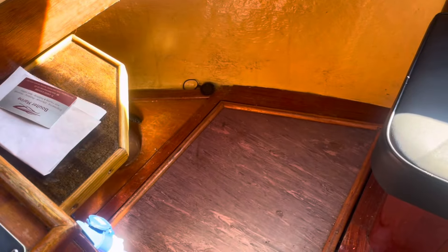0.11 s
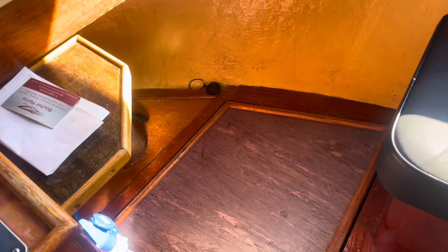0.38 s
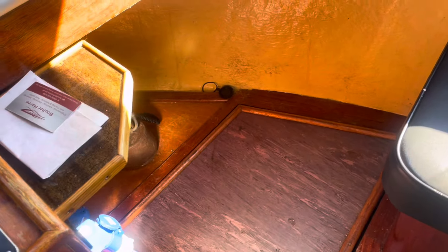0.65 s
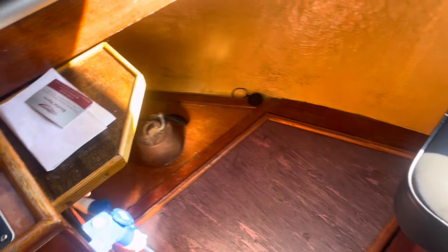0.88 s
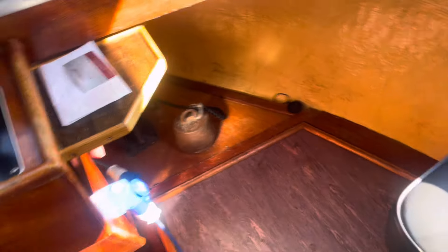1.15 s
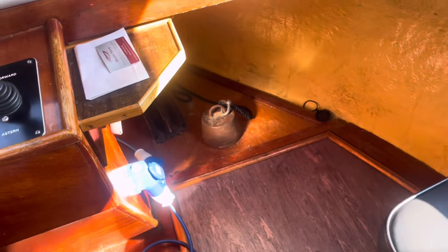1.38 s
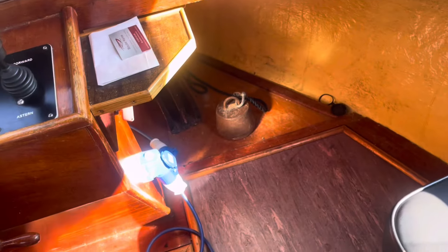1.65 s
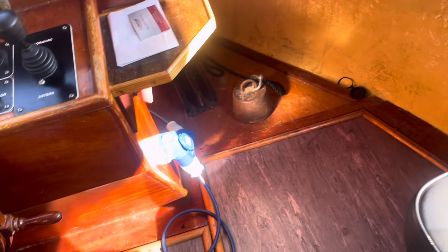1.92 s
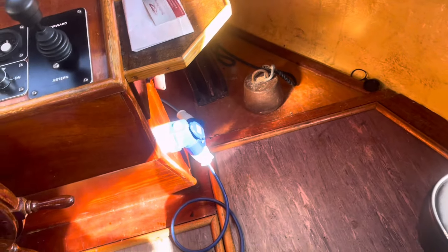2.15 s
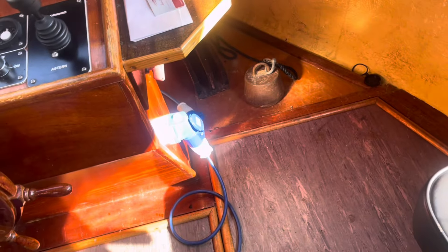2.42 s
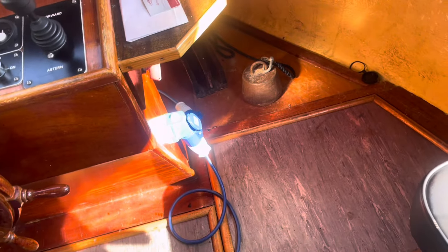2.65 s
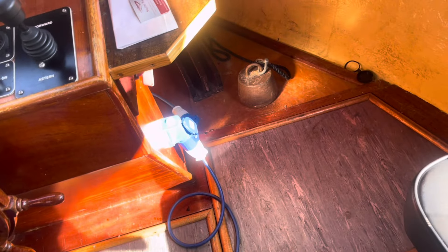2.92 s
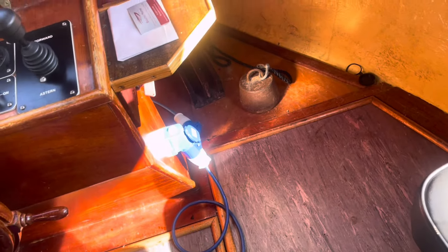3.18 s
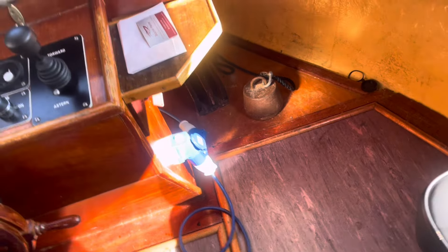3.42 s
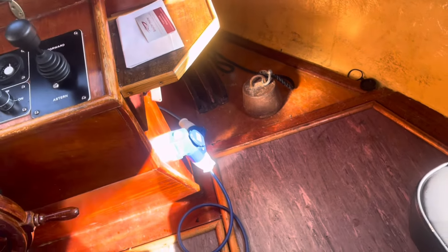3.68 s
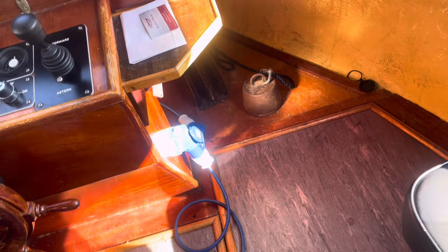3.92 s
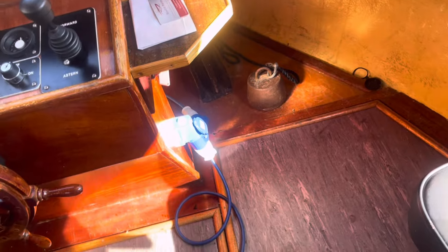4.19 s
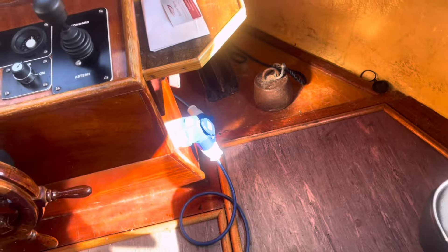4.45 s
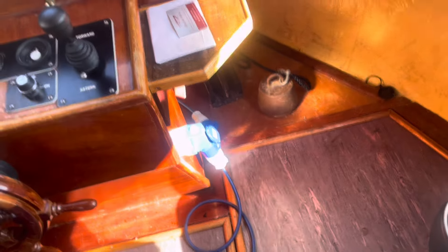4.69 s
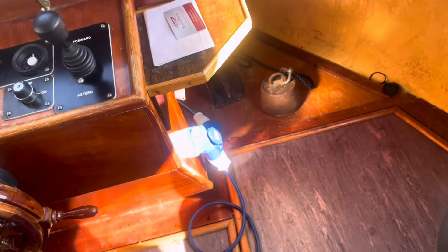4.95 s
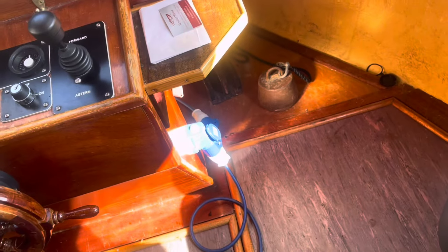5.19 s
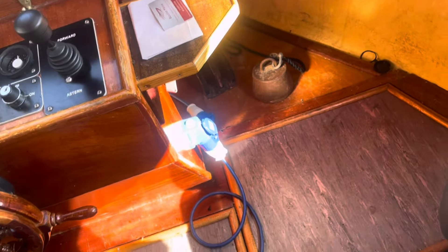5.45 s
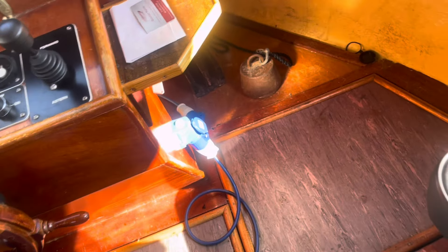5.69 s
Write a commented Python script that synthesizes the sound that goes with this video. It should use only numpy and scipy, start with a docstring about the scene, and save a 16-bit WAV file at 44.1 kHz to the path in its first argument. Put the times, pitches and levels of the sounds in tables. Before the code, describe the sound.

A small wooden boat cabin, heard close up through a handheld stereo microphone with short, dry echoes. A faint, slightly wavering low hum and soft rumble run underneath, the hum rising a little around 1 s and 3 s and nearly vanishing after 5 s. At about 0.15 to 0.25 s a hard wooden knock and bright click break out, rattling rapidly to rest by 0.35 s, followed by a double hollow knock at 0.4 s. Soft, deep thumps cluster from 0.95 to 1.2 s, with another at 1.55 s alongside a thin, high tick. Small low bumps and weak taps come at 2.05 to 2.5 s and near 3.2 s, with a light click at 3.4 s. Cloth and hand rustle swells from 3.6 s with a hollow shuffle. A firmer plank knock lands at 4.65 s, then airy rustling and fine ticks continue to the end, near 5.8 s.

```python
"""A faint hum and a low rumble run throughout, with cloth and hands rustling close by, inside a
small wooden boat cabin heard by a handheld pair of microphone ports. Hum is a wandering sine; rumble,
hollow shuffle and rustle are shaped noise. Knocks ring the modes of the woodwork, ticks are cracks of
noise with ringing small parts, bumps along a plank to the microphone are falling sweeps, and sparse
echoes give the cabin."""
import sys
import numpy as np
from scipy import signal
from scipy.fft import rfft, irfft, next_fast_len
from scipy.io import wavfile
from scipy.ndimage import uniform_filter1d

SR = 44100
rng = np.random.default_rng(int(sys.argv[2]) if len(sys.argv) > 2 else 0)


def voltage_ratio(level):
    """Linear amplitude factor for a level in decibels (scalar or array-like)."""
    return 10 ** (np.asarray(level, float) / 20)


def master_out(mix):
    """Clip the mix to full scale and print it as 16-bit PCM to the path in sys.argv[1]."""
    frames = np.transpose(np.atleast_2d(mix))
    ceiling = np.clip(frames, -1, 1)
    pcm = np.round(ceiling * 32767).astype(np.int16)
    wavfile.write(sys.argv[1], SR, pcm)


N = 257103  # samples

# Level of the hum. Each row: time in seconds, level in dB.
HUM_LEVEL = [(0, -55.5), (.5, -54), (1, -49.5), (1.5, -54), (2.001, -59), (2.5, -58.5), (2.8, -50.5),
             (3.4, -51.5), (3.6, -59), (4.3, -57), (4.9, -64), (5.4, -70), (5.83, -60)]
# Low noise in the cabin. Each row: time in seconds, rumble in dB, hollow shuffle of the woodwork in dB.
LOW_LEVELS = [(0, -42, -59), (.34, -47, -50.5), (.58, -51, -65.5), (.76, -46, -60.5), (1.0, -48, -55),
              (1.12, -54, -47), (1.29, -52.5, -62.5), (1.8, -53.5, -63.5), (2.03, -49.5, -62),
              (2.16, -57, -64.5), (2.34, -53, -60), (3.0, -53, -64), (3.64, -47.5, -52.5),
              (3.95, -48.5, -50), (4.24, -51, -53.5), (4.6, -48, -63), (5.08, -54.5, -54),
              (5.47, -59.5, -56), (5.83, -53.5, -60.5)]
# Spectra of rumble, shuffle and cloth. Each row: frequency in Hz, relative density in dB per Hz.
RUMBLE_SPECTRUM = [(22, 2), (35, -2), (58, 0), (70, -2.5), (85, 2.5), (115, -12), (160, -9), (300, -59),
                   (1000, -91)]
SHUFFLE_SPECTRUM = [(90, -22.5), (170, -0.5), (300, -0.5), (450, -4), (700, -11), (1000, -20),
                    (1500, -25.5), (3000, -35), (6000, -98)]
CLOTH_SPECTRUM = [(500, -6), (1000, -0.5), (1600, -1.5), (2300, 2), (4500, 8.5), (6500, 9), (8300, 14.5),
                  (11000, 8.5), (13000, 9.5), (14600, 11), (15600, 8), (16200, -21)]
# Faint rustle between the strokes. Each row: time in seconds, level in dB before the treble lift.
RESTLESS_LEVEL = [(0, -82), (.5, -75), (.8, -68), (1.25, -68.5), (1.46, -88), (1.8, -72), (2.3, -86),
                  (2.4, -71.5), (2.84, -67.5), (2.89, -69), (2.92, -63), (4.36, -63.5), (4.45, -88),
                  (4.55, -67.5), (4.95, -74.5), (5.1, -72), (5.83, -61)]
# Strokes of cloth and hands. Each row: peak in seconds, level in dB before the lift, swell in seconds,
# fade in seconds, treble lift in dB. Swell and fade each span 20 dB.
CLOTH_STROKES = [(.14, -61.5, 0.018, 0.091, -21), (0.239, -39.5, 0.011, .04, -35),
                 (0.289, -37.5, 0.044, 0.096, -19.5), (.41, -58, 0.042, 0.11, -25),
                 (.53, -69, 0.024, .07, -5), (0.661, -52.5, 0.084, 0.097, -23),
                 (1.04, -64, 0.24, 0.36, -24.5), (1.18, -55.5, .04, 0.058, -26.5),
                 (1.23, -59.5, 0.051, 0.039, 1), (1.36, -69, 0.21, 0.099, -3),
                 (1.57, -54, 0.072, 0.14, -10), (1.99, -65, 0.19, 0.075, -16),
                 (2.1, -63, 0.092, 0.11, -10.5), (2.181, -63, 0.017, 0.066, -39),
                 (2.38, -60.5, 0.12, 0.76, -20), (2.83, -62, 0.077, .06, -5),
                 (3.29, -55.5, 0.025, 0.17, -31.5), (3.41, -57, 0.2, 0.043, -11),
                 (3.6, -51.5, 0.091, 0.24, -17.5), (3.74, -51, 0.19, 0.15, -17.5),
                 (3.94, -55.5, 0.077, 0.19, -21), (4.199, -53, 0.055, 0.063, -21),
                 (4.33, -55.5, 0.16, .11, -13), (4.58, -61, 0.15, 0.093, -14.5),
                 (4.828, -55.5, 0.11, 0.032, -10), (4.99, -56.5, .08, 0.18, -17),
                 (5.26, -58, 0.12, 0.28, -27), (5.45, -48, 0.63, 0.16, -7.5), (5.55, -53, 0.3, 0.066, -13),
                 (5.66, -56, 0.16, 0.12, -12), (5.8, -56, 0.09, 0.18, -5)]
# Knocks on wood. Each row: start in seconds, peak in dB, centre of the blow's spectrum in Hz,
# width in octaves.
WOOD_KNOCKS = [(.141, -37, 487, 1.9), (.230, -31.5, 400, 3.6), (.241, -21, 326, 1.13),
               (.400, -26.5, 390, 0.93), (.426, -28.5, 388, 0.82), (.925, -41, 750, 0.55),
               (.942, -68, 730, 0.5), (0.967, -37, 84.6, 0.74), (1.027, -28.5, 101, 0.31),
               (1.064, -39.5, 330, 1), (1.082, -37, 527, 0.22), (1.07, -23, 115, 0.32),
               (1.0875, -26, 119, 0.3), (1.105, -32.5, 121, 0.7), (1.126, -26.5, 62, 0.22),
               (1.18, -46.5, 390, 0.4), (1.205, -29.5, 66, 0.54), (1.558, -34.5, 107, 0.37),
               (2.178, -52, 1290, 1.3), (2.192, -45.5, 776, 0.22), (2.21, -49, 670, 0.27),
               (2.109, -42, 109, 0.99), (2.298, -39.5, 106, 0.41), (2.318, -37.5, 91.5, 0.28),
               (3.283, -46, 1100, 0.59), (3.298, -43.5, 690, 0.33), (3.59, -49, 497, 0.78),
               (3.719, -42, 570, 2), (4.09, -41.5, 80, 0.61), (4.732, -44, 71, 1.8), (5.6, -49, 850, 0.63),
               (5.71, -49, 748, 0.72), (3.979, -41, 282, 0.086), (0.039, -44.5, 560, 0.76)]
# Modes of the woodwork. Each row: frequency in Hz, relative strength in dB, t60 in seconds.
WOOD_MODES = [(57.5, 17, 0.13), (88.3, -5, 0.21), (115, -1, 0.083), (170, -13, 0.16), (200, 6.5, 0.08),
              (300, -13, 0.076), (352.2, -11, 0.22), (400, 3, 0.083), (414, -4, 0.064), (511.7, 0.5, 0.084),
              (591.4, -4.5, 0.13), (654.5, -4.5, 0.063), (739.5, -6, 0.072), (819, -1, 0.032),
              (911, -14, 0.16), (1259, -6.5, 0.043), (1465, -5.5, 0.042), (1970, -2.5, 0.029)]
# Ticks of small hard parts. Each row: start in seconds, relative strength in dB, centre in Hz,
# width in octaves, t60 of the crack in seconds.
PART_TICKS = [(.139, -39.5, 10800, 0.7, 0.054), (0.237, -15.5, 7950, 0.42, 0.038),
              (0.397, -41, 3730, 0.34, 0.051), (.452, -60, 9000, 1.17, 0.033),
              (0.529, -26.5, 13900, 0.18, 0.02), (0.529, -42.5, 13000, 1.46, 0.064),
              (.806, -59.5, 12100, 0.95, 0.026), (1.22, -57, 12000, 1.1, .04),
              (1.237, -44.5, 6450, 0.6, .04), (1.340, -56, 13000, 1.5, 0.02),
              (1.351, -51.5, 6100, 1.1, 0.012), (1.496, -59, 9000, 1.5, 0.27),
              (1.551, -52, 8900, 2.8, 0.15), (1.566, -39.5, 8800, 1.75, 0.21),
              (1.564, -24, 15100, 0.094, 0.03), (1.576, -26, 15200, 0.068, 0.1),
              (1.886, -59, 11900, 0.63, 0.032), (2.175, -52.5, 3000, 0.88, 0.032),
              (2.326, -35, 3100, 0.15, 0.13), (3.402, -31.5, 5200, .1, 0.065),
              (2.797, -57, 14100, 0.25, 0.1), (2.815, -49, 13800, 0.23, .1), (2.832, -55, 13800, .25, .1),
              (3.281, -49.5, 3500, 1, 0.13), (3.399, -49, 13000, 2.1, 0.025),
              (4.063, -53, 13100, .8, 0.038), (4.192, -49, 10900, 0.8, 0.055),
              (4.356, -49, 5000, 1.9, 0.032), (4.832, -52, 13100, 0.66, 0.037),
              (4.978, -52, 7000, 1.4, 0.029), (5.186, -42.5, 13000, 0.85, 0.02),
              (5.259, -39, 13500, 1.05, 0.022), (5.376, -42, 13900, 0.57, 0.058),
              (5.64, -53, 12000, 0.98, 0.086), (5.79, -37.5, 12200, 0.8, 0.018),
              (5.791, -23.5, 5200, 0.054, 0.051)]
# Modes of the small parts. Each row: frequency in Hz, relative strength in dB, t60 in seconds.
PART_MODES = [(3100, -22, 0.084), (5200, -17, 0.08), (6360, -7, .015), (9540, -20, 0.015),
              (12800, -8, 0.08), (14370, 0, .08), (15280, -6, .11)]
# Bumps through a plank. Each row: start in seconds, strength in dB before shaping, strongest pitch
# in Hz, spread of pitch in octaves, swings per octave of fall.
PLANK_BUMPS = [(2.0592, -31, 106, 1.27, 0.91), (2.12, -37, 100, 1.13, 0.75), (2.4766, -36, 170, 1.03, 1.04),
               (3.186, -38, 200, 0.68, 0.61), (4.612, -53, 580, 0.49, 1.1),
               (4.6355, -25.5, 610, 0.23, 2.14), (4.640, -35, 650, 0.2, 2.33),
               (4.6605, -43, 570, 0.86, 1.03), (4.633, -31, 90, 0.8, 0.93), (4.6616, -24, 128, 0.94, 0.83)]
# Echo decay of the cabin. Each row: frequency in Hz, t60 in seconds.
CABIN_DECAY = [(100, 0.32), (500, 0.22), (2000, 0.57), (8000, 0.13), (16000, 0.095)]
# The two microphone ports. Each row: frequency in Hz, likeness from 0 to 1, left port's lead in radians.
PORT_PAIR = [(60, .93, -.3), (300, .9, -.25), (700, .62, -.5), (1300, .25, -.6), (2400, .35, .1),
             (4400, .62, .3), (6400, .5, -.7), (7650, .998, -3.0), (8850, .998, -3.3), (9500, .98, -5.0),
             (10500, .998, -6.2), (12700, .998, -6.4), (13500, .99, -7.6), (14100, .999, -9.35),
             (16800, .999, -9.5)]


def evened(x):
    """Scales to rms 1."""
    return x / np.sqrt(np.mean(x ** 2) + 1e-20)


def read(points, hz, col=1):
    """Reads a spectrum table on a log-frequency axis."""
    table = np.transpose(points)
    return np.interp(np.log(hz + 1), np.log(table[0] + 1), table[col])


def add(mix, s, sound):
    """Mixes a sound in at time s, in seconds."""
    part = mix[round(s * SR):][:len(sound)]
    part += sound[:len(part)]


def bell(hz, centre_hz, octaves):
    """Weight that falls off on both sides of a centre pitch."""
    return np.exp(-.5 * (np.log2((hz + 1) / centre_hz) / max(octaves, .08)) ** 2)


def port_likeness(hz):
    """Likeness of the noise at the two ports for each pitch, as a column."""
    return np.clip(read(PORT_PAIR, hz), 0, 1)[:, None]


def hum():
    """A sine whose pitch wanders slightly while its level follows a curve."""
    wander = evened(uniform_filter1d(rng.standard_normal(N), SR // 4))
    pitch_hz = 79.3 + 0.42 * wander
    turns = np.cumsum(pitch_hz) / SR
    level_db = np.interp(np.arange(N) / SR, *np.transpose(HUM_LEVEL))
    return np.sqrt(2) * np.sin(2 * np.pi * turns) * voltage_ratio(level_db)


def air(spectrum, rows, col, size, patchy_db, flicker_db, lift=None):
    """Noise at both ports: a spectrum, a level curve, drifting patches and flicker shared by all pitches."""
    hop = size // 4
    frames, hz = N // hop + 5, np.fft.rfftfreq(size, 1 / SR)
    a, b, c, d, patches, streaks = rng.standard_normal((frames, len(hz), 6)).T
    # patches span many pitches, streaks only a few
    patches = evened(uniform_filter1d(uniform_filter1d(patches, 12, 0), 24, 1))
    streaks = evened(uniform_filter1d(uniform_filter1d(streaks, 2, 0), 16, 1))
    flicker = evened(uniform_filter1d(rng.standard_normal(frames), 3))
    table, t = np.transpose(rows), np.arange(frames) * hop / SR
    db = patchy_db * (patches + 0.5 * streaks) + flicker_db * flicker
    if lift:  # smoother, faster strokes hiss higher
        tilt = np.clip(np.log2((hz[:, None] + 1) / 4500) / 2.23, -.55, 1)
        db = db + tilt * np.interp(t, table[0], table[lift])

    same, left = port_likeness(hz), a + 1j * b
    right = same * left + np.sqrt(1 - same ** 2) * (c + 1j * d)
    z = np.array([left, right]) * voltage_ratio(read(spectrum, hz))[:, None]
    plain = signal.istft(z, nperseg=size, noverlap=size - hop)[1]
    level = np.sqrt(np.mean(plain ** 2))
    noise = signal.istft(z * voltage_ratio(db), nperseg=size, noverlap=size - hop)[1][:, :N] / level
    return noise * voltage_ratio(np.interp(np.arange(N) / SR, table[0], table[col]))


def rumble():
    """Low noise standing in the cabin."""
    return air(RUMBLE_SPECTRUM, LOW_LEVELS, col=1, size=2048, patchy_db=.8, flicker_db=1.2)


def shuffle():
    """Hollow noise of the woodwork, shaped around its low-middle pitches."""
    return air(SHUFFLE_SPECTRUM, LOW_LEVELS, col=2, size=1024, patchy_db=1.2, flicker_db=1.2)


def strokes():
    """Level and treble lift of the rustle: strokes swell and fade over a restless floor."""
    roundness = 1.18  # 1 = pointed peak, 2 = round swell
    restless_lift_db = -16.5
    t = np.arange(0, N + 256, 64) / SR
    s, db, swell, fade, lift_db = np.transpose(CLOTH_STROKES)[:, :, None]
    before, after = (s - t) / np.maximum(swell, .003), (t - s) / np.maximum(fade, .003)
    away = np.where(t < s, before, after)
    power = voltage_ratio(db - 20 * away ** roundness) ** 2
    floor = voltage_ratio(np.interp(t, *np.transpose(RESTLESS_LEVEL))) ** 2
    total = power.sum(0) + floor
    mean_lift_db = ((power * lift_db).sum(0) + floor * restless_lift_db) / total
    return np.transpose([t, 10 * np.log10(total), mean_lift_db])


def rustle():
    """Cloth and hands close by: noise that follows the strokes in level and treble."""
    return air(CLOTH_SPECTRUM, strokes(), col=1, size=256, patchy_db=2.0, flicker_db=0.76, lift=2)


def hollowed(x):
    """Narrow resonances come and go in the noise, about 40 Hz wide and a fifth of a second long."""
    depth_db = 2.5
    z = signal.stft(x, nperseg=2048, noverlap=1536)[2]
    field = rng.standard_normal(z.shape[:0:-1])  # frames by pitches
    field = evened(uniform_filter1d(uniform_filter1d(field, 16, 0), 2, 1)).T
    gain = evened(voltage_ratio(depth_db * field))
    return signal.istft(z * gain, nperseg=2048, noverlap=1536)[1][:, :N]


def ring(modes, centre_hz, octaves, chance, rise):
    """Modes set ringing by one blow; each blow lands on another spot, so their shares vary."""
    hz, db, t60 = np.transpose(modes)[:, :, None]
    t = np.arange(SR // 3) / SR
    share = voltage_ratio(db + 2 * chance[:, None]) * bell(hz, centre_hz, octaves)
    decay = voltage_ratio(-60 * t / np.maximum(t60, .01))
    onset = 1 - np.exp(-t * hz / rise)  # rise in cycles
    return (share * decay * np.sin(2 * np.pi * hz * t) * onset).sum(0)


def rattle(db, *colour, count=5):
    """Rows of a small part rattling to rest: each gap shorter, each touch weaker."""
    start_s, gap_s, shrink, loss_db = .263, .018, .9, 2
    gaps = gap_s * shrink ** np.arange(count)
    return [(start_s + gaps[:k].sum(), db - k * loss_db, *colour) for k in range(count)]


def knocks():
    """Blows on the woodwork; soft heavy ones wake the low modes, hard ones the high."""
    blows = [*WOOD_KNOCKS, *rattle(-25.5, 380, 1.65)]  # first dB, centre Hz, width octaves
    out, chance = np.zeros(N), rng.standard_normal((len(blows), len(WOOD_MODES)))
    for (s, db, centre_hz, octaves), spot in zip(blows, chance):
        sound = ring(WOOD_MODES, centre_hz, octaves, spot, rise=1.0)
        add(out, s, voltage_ratio(db) * sound / abs(sound).max())
    return out


def ticks():
    """A short crack of noise and the ring of the struck part, with a brief separate noise in each port."""
    out, t = np.zeros((3, N)), np.arange(SR // 3) / SR
    hz = np.fft.rfftfreq(len(t), 1 / SR)
    # first dB, centre Hz, width octaves, t60 s (held to at least 5 ms below)
    touches = [*PART_TICKS, *rattle(-28, 6300, 1, -0.06)]
    chances = rng.standard_normal((len(touches), 3, len(t)))
    for (s, db, centre_hz, octaves, t60), chance in zip(touches, chances):
        hiss = irfft(rfft(chance) * bell(hz, centre_hz, octaves), len(t))
        hiss = evened(hiss) * (1 - np.exp(-t / .0003))
        noisy = min(octaves, 1.1) ** 2  # narrow ticks are mostly ring
        crack = noisy * hiss[0] * voltage_ratio(-60 * t / max(t60, .005))
        tone = ring(PART_MODES, centre_hz, octaves, chance[0, :len(PART_MODES)], rise=0.94)
        add(out[0], s, voltage_ratio(db) * (.5 * crack + 0.65 * tone))
        for port in (1, 2):
            add(out[port], s, voltage_ratio(db) * 0.56 * noisy * hiss[port] * voltage_ratio(-60 * t / 0.016))
    return out[0], out[1:]


def bumps():
    """Bending waves spread out on their way: treble first, each swing longer than the last."""
    out, t = np.zeros(N), np.arange(1, SR // 8) / SR
    fade = np.exp(-(t / 0.051) ** 4)  # the slowest swings are lost
    for s, db, centre_hz, octaves, swings in PLANK_BUMPS:
        pitch_hz = swings / (np.log(2) * t)
        wave = np.cos(2 * np.pi * swings * np.log2(t / 0.0194))
        add(out, s, voltage_ratio(db) * wave * bell(pitch_hz, centre_hz, octaves) * fade)
    return out


def cabin(x):
    """Sparse echoes of random sign, each band dying at its own speed."""
    taps = np.zeros((2, SR // 2))
    at = np.arange(100, SR // 2 - 20, 20) + rng.integers(0, 20, (2, (SR // 2 - 101) // 20))
    np.put_along_axis(taps, at, rng.choice([-1., 1.], at.shape), 1)
    hz, t, z = signal.stft(taps, SR, nperseg=256)
    same = port_likeness(hz)
    z = np.array([z[0], same * z[0] + np.sqrt(1 - same ** 2) * z[1]])
    decay = voltage_ratio(-60 * t / read(CABIN_DECAY, hz)[:, None])
    tail = signal.istft(z * decay, SR, nperseg=256)[1]
    return signal.fftconvolve(x[None], tail / np.linalg.norm(tail[0]), axes=1)[:, :N]


def scene():
    """Hum, rumble, shuffle and rustle under the knocks, ticks and bumps."""
    wood, (parts, port_bursts), plank = knocks(), ticks(), bumps()
    steady = hum() + rumble()
    rub = hollowed(shuffle() + rustle())
    echoes = cabin(voltage_ratio(-9) * wood + voltage_ratio(-6) * parts + voltage_ratio(-20) * plank)
    placed_parts = parts * voltage_ratio([[1], [-1]])  # dB: a little to the left
    return steady + rub + wood + placed_parts + port_bursts + plank + echoes


def band_limit(x):
    """A steep low-pass at the top of the band."""
    return signal.sosfilt(signal.butter(12, 16820, fs=SR, output="sos"), x)


def record(dry):
    """A low cut, then the ports turn the phase against each other as the pitch rises."""
    low_cut = signal.butter(3, 40.6, "high", fs=SR, output="sos")  # Hz
    cut = signal.sosfilt(low_cut, dry)
    size = next_fast_len(N + 4096)
    lead = read(PORT_PAIR, np.fft.rfftfreq(size, 1 / SR), col=2)
    turn = np.exp(.5j * np.array([lead, -lead]))  # half the lead to each port
    ports = irfft(rfft(cut, size) * turn, size)[:, :N]
    return band_limit(ports)


dry = scene()
out = record(dry)
master_out(out)
```